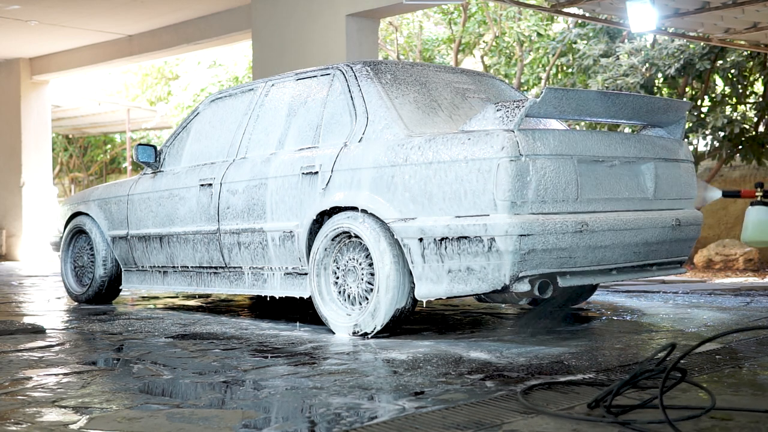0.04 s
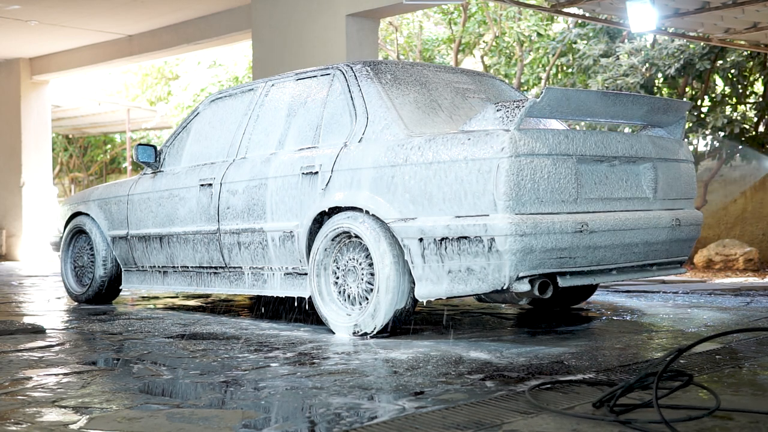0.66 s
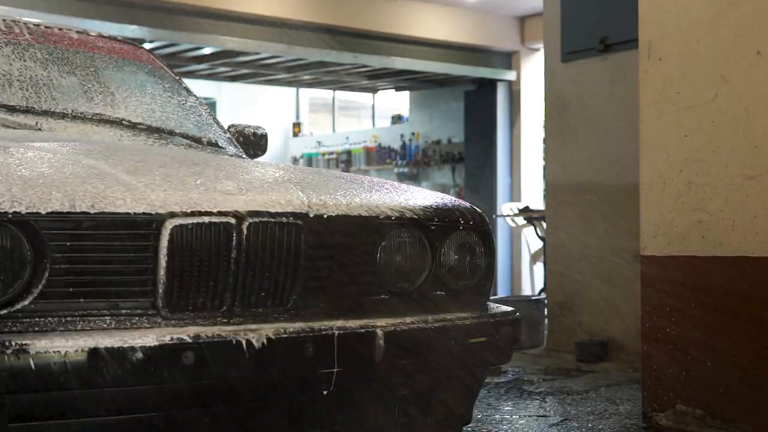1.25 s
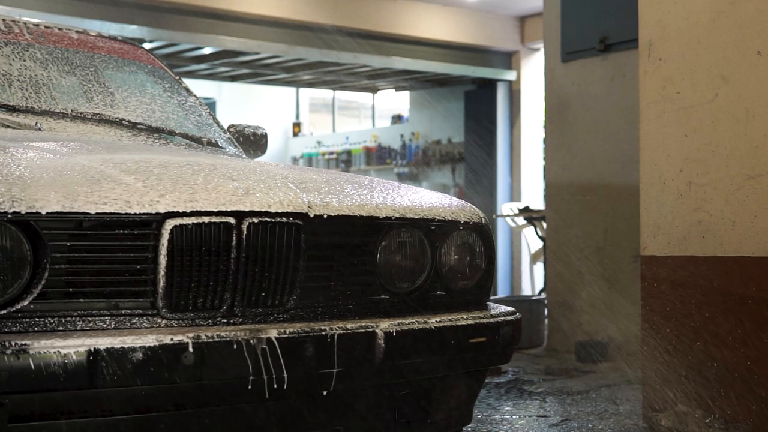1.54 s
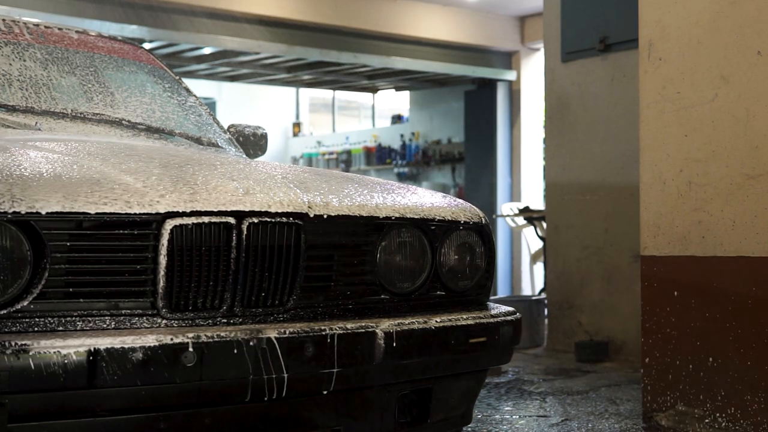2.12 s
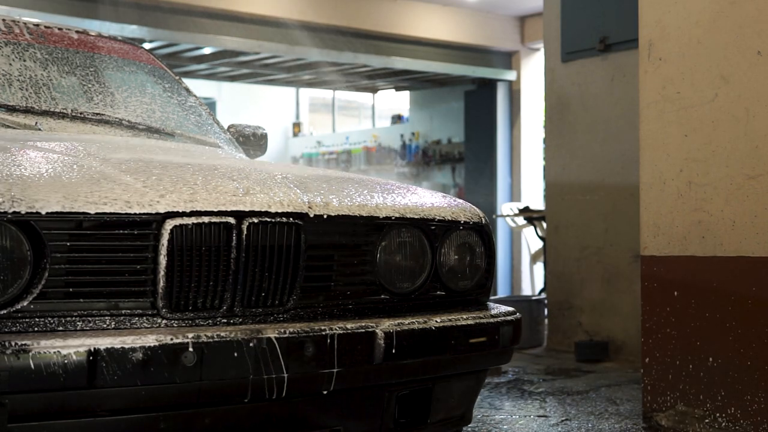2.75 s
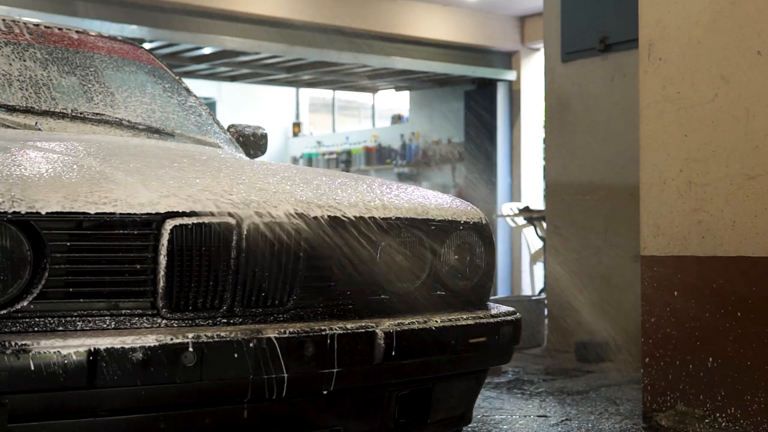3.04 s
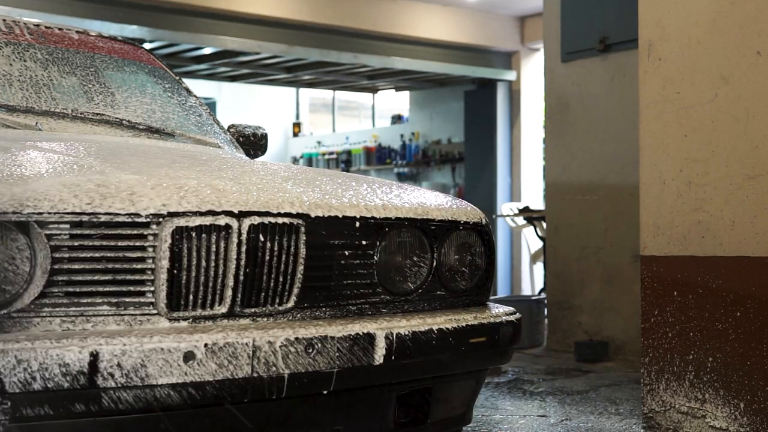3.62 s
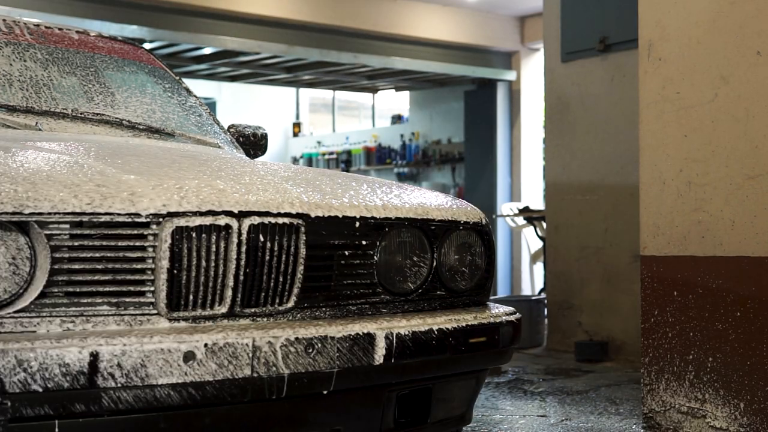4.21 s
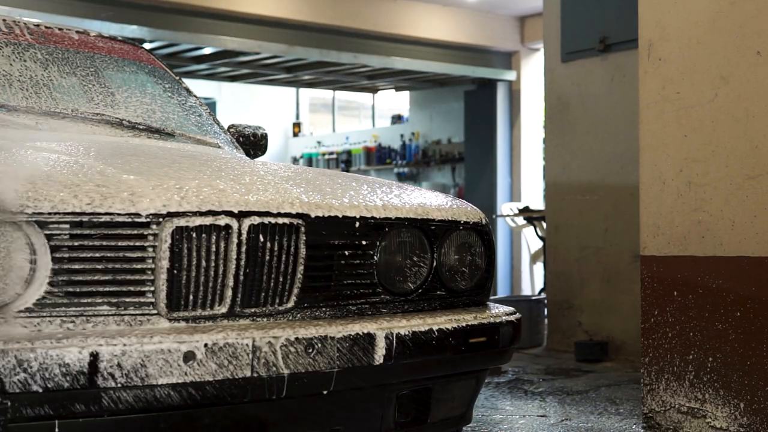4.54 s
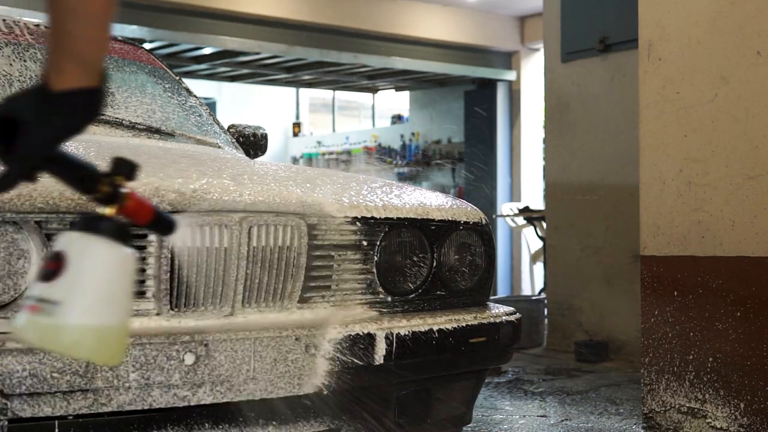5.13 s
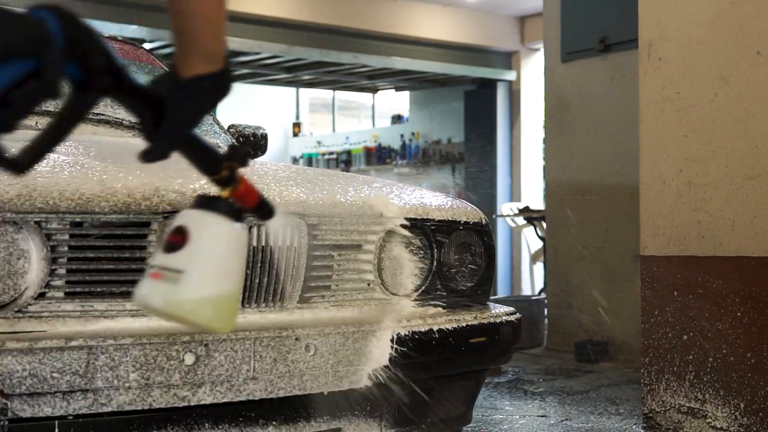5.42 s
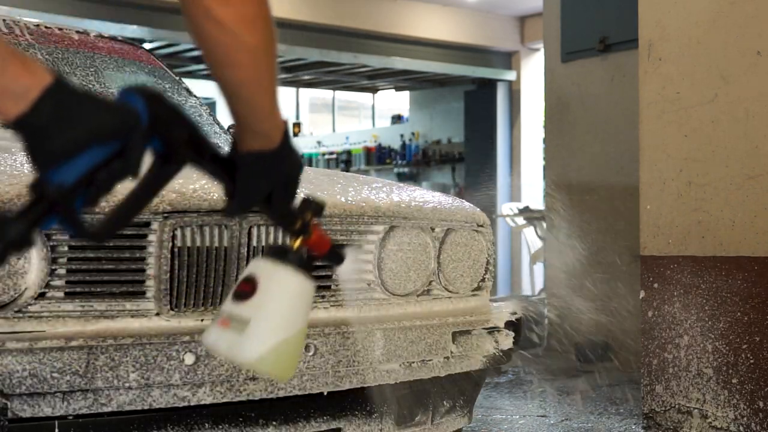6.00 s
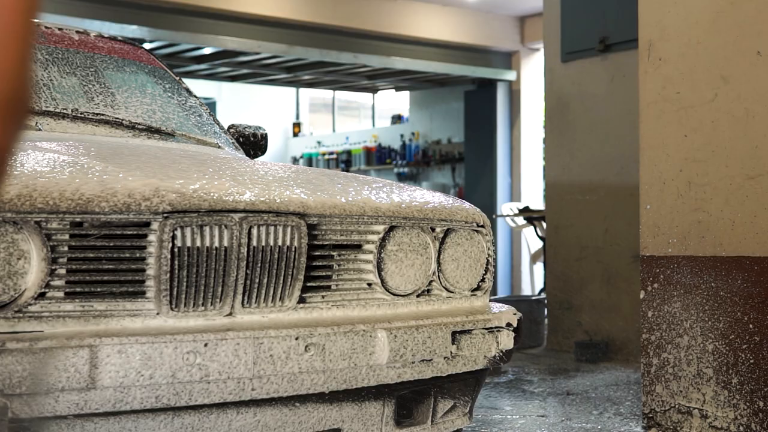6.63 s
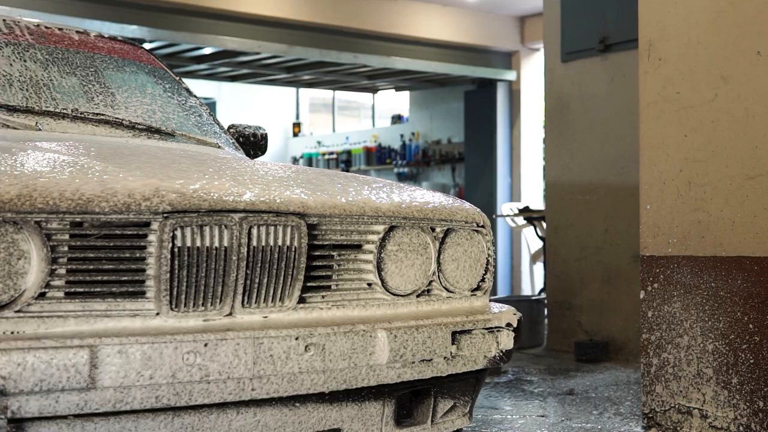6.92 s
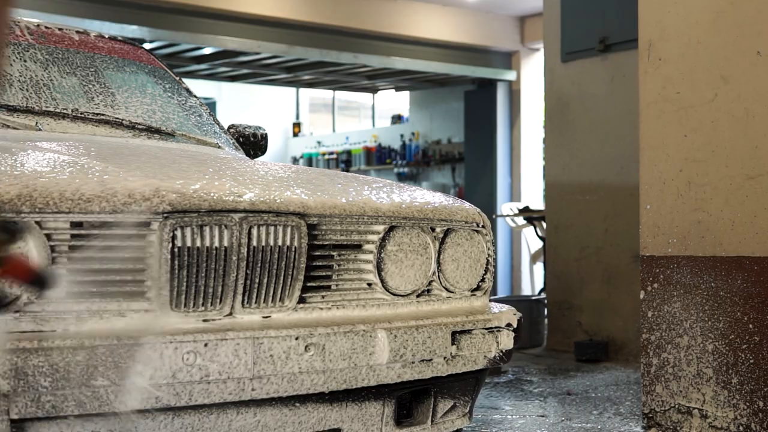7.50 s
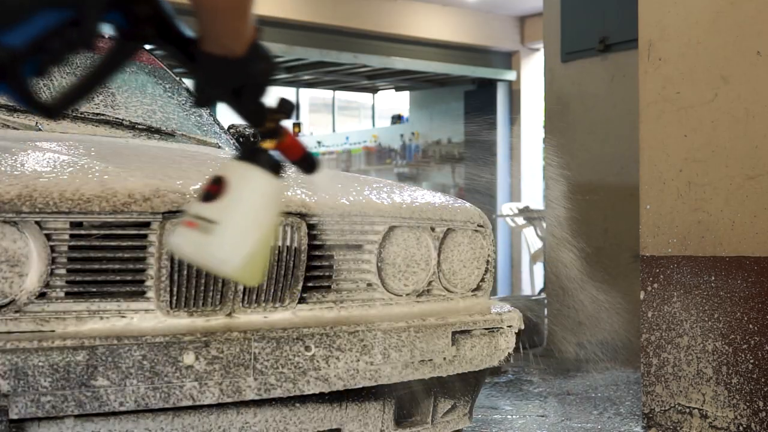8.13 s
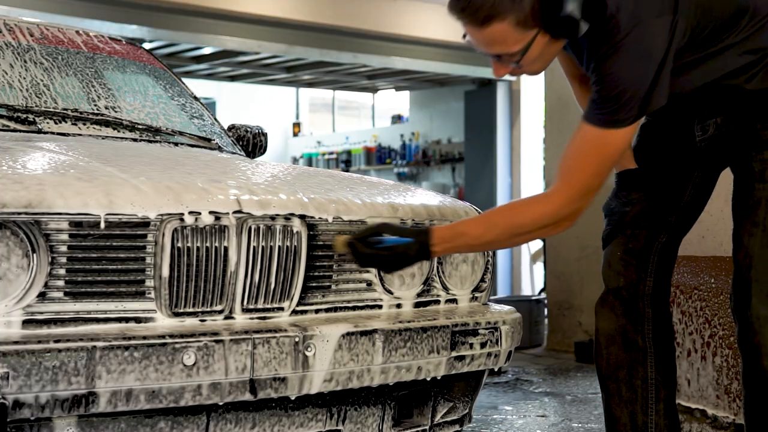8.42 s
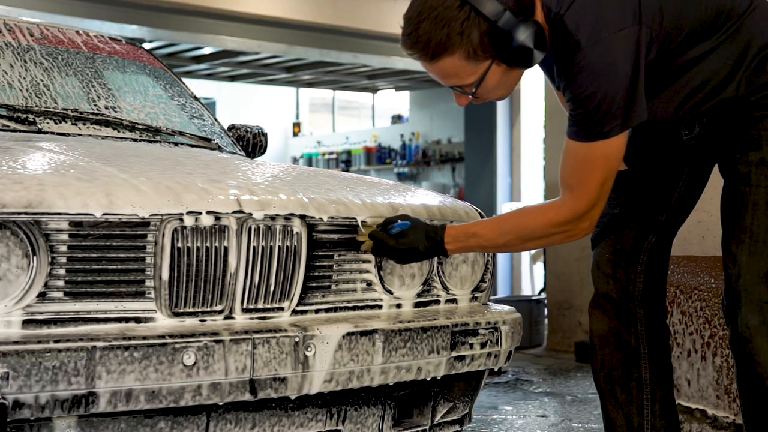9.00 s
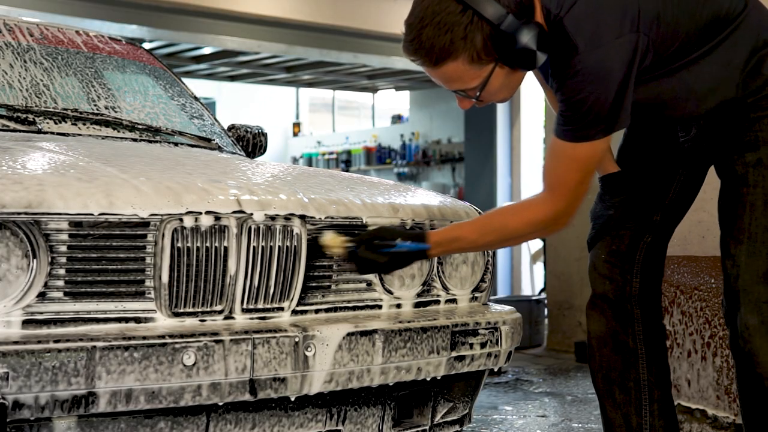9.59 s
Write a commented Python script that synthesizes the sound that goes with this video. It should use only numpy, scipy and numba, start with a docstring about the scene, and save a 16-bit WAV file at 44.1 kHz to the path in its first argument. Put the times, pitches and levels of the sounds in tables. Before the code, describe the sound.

A pressure washer hisses foam onto a car over a pump drone, then stops and a wet brush scrubs the grille.

```python
"""Foam wash in a concrete garage

A pressure washer soaps a car, first at the rear, near the droning pump, then at the front.
The turbulent jet hisses, the foam cannon's mixing chamber roars at its resonances, and droplets
patter on the bodywork. Then the spray stops and a soapy brush scrubs the grille over a low motor
hum. Something hollow bumps twice, faintly during the spraying and louder near the end."""
import sys
import numpy as np
from scipy import signal
from scipy.fft import rfft, irfft
from scipy.io import wavfile
from scipy.ndimage import map_coordinates
from numba import njit

SR = 44100
rng = np.random.default_rng(int(sys.argv[2]) if len(sys.argv) > 2 else 0)


def put_to_file(sound):
    """Save the sound as 16-bit audio at rate SR, in the file named by the first command-line argument."""
    columns = np.atleast_2d(sound).T  # one column per channel
    safe = np.clip(columns, -1, 1)
    whole_steps = np.round(safe * 32767)
    wavfile.write(sys.argv[1], SR, whole_steps.astype(np.int16))


N = 429975
T = np.arange(N) / SR
FREQS = np.fft.rfftfreq(N, 1 / SR)
FRONT_S, SCRUB_S = 0.901, 8.240  # the spray moves to the front; the scrubbing begins
SHAFT_HZ, PISTONS = 45.46, 3
TOP_HZ = 15750


# Hiss of the jet, louder as the nozzle turns toward the listener: time_s, level_db
NOZZLE_HISS = [(0.05, -38.0), (1.31, -37), (1.55, -36), (2.27, -37), (2.39, -37.5), (2.75, -35.5),
               (3.53, -39.5), (3.77, -37.5), (3.83, -40.4), (3.95, -39), (4.55, -38.7), (5.57, -36),
               (6.83, -38.5), (6.95, -40.5), (7.73, -37.1), (8.19, -39)]

def spray(turns, aim_db):
    """Common modulation: jet, splash and cannon share one sputtering flow that the pistons ripple."""
    # as the lance swings off the car, the sound widens and moves to the left
    facing_db = swing(NOZZLE_HISS)
    spread_db = at_car(-0.3, -0.55) - 0.4 * aim_db - 0.65 * facing_db
    pan_db = at_car(-0.96, 0.55) - 0.21 * aim_db - 0.27 * facing_db
    hiss = jet(curve(NOZZLE_HISS), aim_db, spread_db)
    wash = splash(aim_db, spread_db) + cannon(aim_db, spread_db)
    wash = reflections(wash, echo_db=-16.5, sway_ms=0.1)
    sputter_db = 0.45 * walk(18) + 0.44 * walk(300)
    ripple_db = 0.11 * np.sin(2 * np.pi * PISTONS * turns)
    return (hiss + wash) * undb(sputter_db + ripple_db + np.array([pan_db, -pan_db]) / 2)


# Strength of the wash at the front, dipping where a sweep runs off the car: time_s, level_db
LANCE_SWEEPS = [(0.96, -42.5), (1.38, -40), (2.46, -37.5), (2.52, -38.5), (2.76, -39), (2.88, -39.7),
                (3.42, -38.5), (3.6, -39), (3.66, -37.5), (3.84, -42.5), (4.08, -37), (4.32, -39),
                (4.56, -44.5), (4.74, -40.5), (6.24, -36), (6.3, -38.5), (6.54, -39), (6.9, -45),
                (7.08, -39.5), (7.38, -43.5), (7.98, -37), (8.19, -38)]

def lance_aim():
    """Incidence: the more squarely the jet strikes, the louder the wash (dB about its mean)."""
    return swing(LANCE_SWEEPS) * after(FRONT_S)


# Spectrum of the jet's hiss: frequency_hz, density_db
JET_SPECTRUM = [(2000, -28.5), (5000, -14.5), (7200, -10), (9500, -4), (11500, -2), (13000, -0.5),
                (15500, -3.5)]

def jet(nozzle_db, aim_db, spread_db):
    """Turbulence in a fast jet radiates broadband noise, strongest in the high treble."""
    hiss = tint(droplets(scatter_db=1, spread_db=spread_db), JET_SPECTRUM)
    level_db = nozzle_db - 0.07 + 0.38 * walk(25) + 0.071 * aim_db
    return unit(hiss, band_hz=(9000, 15000)) * undb(level_db)


# Resonances of the mixing chamber: pitch_ratio, width_hz, relative_db
CHAMBER_MODES = [(0.466, 630, -7), (.915, 666, -1), (1.0, 550, -0.5), (1.096, 610, -1)]

def cannon(aim_db, spread_db):
    """Cavity resonance: churning air and soap excite the chamber, and slugs of foam detune it."""
    roar_hz = at_car(4140, 3955) * np.exp(0.019 * walk(7.4))
    roar = 0
    for ratio, width_hz, db in CHAMBER_MODES:
        churn = droplets(scatter_db=2, spread_db=0.83 * spread_db)
        roar = roar + ring(churn, ratio * roar_hz, width_hz) * undb(db + 0.91 * walk(5))
    roar = unit(roar, band_hz=(3400, 4700)) * undb(0.3 * walk(45))
    roar *= driven(aim_db, rear_db=-39.5, front_db=-42.5, follow=1.12)
    return roar + whistle(aim_db) + surges()


def whistle(aim_db):
    """Narrowband resonance: the chamber's lowest mode filters noise almost to a tone."""
    pitch_hz = 1770 * np.exp(0.016 * walk(10))
    tone = ring(droplets(scatter_db=0.5), pitch_hz, width_hz=210)
    gain = driven(aim_db, rear_db=-54.5, front_db=-54.5, follow=0.47) * undb(2.7 * walk(7.3))
    return unit(tone, band_hz=(1700, 1900)) * gain


# Brief surges of one chamber resonance: middle_s, pitch_hz, level_db, length_s
CHAMBER_SURGES = [(.31, 4200, -39, 0.18), (1.38, 4390, -46, .2), (2.03, 4120, -43, .07),
                  (2.46, 4060, -43, .06), (2.79, 3860, -44, 0.083), (3.002, 3860, -41, .07),
                  (3.332, 4460, -40.5, 0.1), (3.46, 1790, -46.5, .16), (3.657, 3970, -45, .06),
                  (4.297, 1800, -48, .1), (5.196, 3830, -41, .05), (6.18, 3950, -50, .14),
                  (8.15, 1770, -46.5, .14)]

def surges():
    """Mode selection: now and then the chamber briefly locks onto one narrow resonance."""
    middles_s, pitches_hz, _, _ = np.transpose(CHAMBER_SURGES)
    nearest = np.abs(T - middles_s[:, None]).argmin(axis=0)
    envelope = sum(undb(db) * swell(s, length_s) for s, _, db, length_s in CHAMBER_SURGES)
    return unit(ring(droplets(scatter_db=1), pitches_hz[nearest], width_hz=180)) * envelope


# Spectrum of droplets striking the car: frequency_hz, density_db
SPLASH_SPECTRUM = [(300, -32), (750, -10.5), (1050, -8.5), (1500, -2.5), (2600, 2.5), (5000, 1), (7500, -4),
                   (15000, -11)]

def splash(aim_db, spread_db):
    """Impact noise: countless droplet strikes merge into a continuous patter."""
    patter = tint(droplets(scatter_db=3, spread_db=0.86 * spread_db), SPLASH_SPECTRUM)
    gain = driven(aim_db, rear_db=-46.5, front_db=-49.5, follow=1.12)
    return unit(patter, band_hz=(2200, 3100)) * gain


# Spectrum of water drumming on sheet metal: frequency_hz, density_db
PANEL_SPECTRUM = [(40, -34), (90, -32), (180, -8), (300, -3), (500, 3), (750, -0.5), (1100, -2), (2000, -2),
                  (6000, -55)]

def panels(aim_db):
    """Forced vibration: body panels driven by the water radiate in the midrange."""
    drumming = tint(droplets(scatter_db=2.5), PANEL_SPECTRUM)
    gain = driven(aim_db, rear_db=-56, front_db=-62.5, follow=1.04) * undb(0.8 * walk(10))
    return unit(drumming, band_hz=(610, 1100)) * gain


# Spectrum of the bonnet's hollow boom: frequency_hz, density_db
BONNET_SPECTRUM = [(40, -18), (90, -2), (140, -2), (220, -3), (400, 0), (1000, -40)]
# Swells where the jet lingers on the bonnet: middle_s, length_s, level_db
BONNET_SWELLS = [(1.85, .2, -67), (2.74, .36, -69), (4.18, .36, -77)]

def bonnet(aim_db, start_s=1.6):
    """Plate vibration: the broad sheet of the bonnet booms faintly under the jet."""
    steady = undb(-72.5 + 0.8 * aim_db + 1.5 * walk(4))
    swells = sum(undb(db) * swell(s, length_s) for s, length_s, db in BONNET_SWELLS)
    boom = unit(tint(droplets(scatter_db=1.5), BONNET_SPECTRUM))
    return boom * np.hypot(steady, swells) * after(start_s)


# Pump tones at the rear of the car: shaft_harmonic, relative_db
REAR_HARMONICS = [(2, -70.5), (3, -69), (4, -68), (5, -60), (6, -53), (7, -62), (8, -54.5), (9, -43),
                  (10, -49), (11, -55), (12, -52.5), (13, -58), (14, -73), (15, -54.5), (16, -69),
                  (17, -59.5), (19, -58.5), (20, -69), (21, -73), (22, -69), (24, -60), (25, -66),
                  (26, -63.2), (27, -71.5), (28, -71), (30, -64), (31, -57), (32, -62), (33, -72),
                  (34, -57.5), (36, -65), (39, -71), (40, -62), (43, -54)]
# Pump tones at the front of the car: shaft_harmonic, initial_relative_db, drift_db_per_s
FRONT_HARMONICS = [(3, -78, 0.5), (5, -73.5, 0), (6, -64, 0.54), (7, -76, 0), (8, -66.5, -.5),
                   (9, -63.5, -1.9), (10, -64, -0.6), (11, -65, 0), (12, -60, -0.83), (13, -71.5, 0.5),
                   (15, -69, 0), (18, -71, 0), (23, -78, 0), (24, -82, 1)]
# Spectrum of the rattling valves: frequency_hz, density_db
VALVE_SPECTRUM = [(40, -24), (140, -26), (230, -0.5), (400, 2.5), (600, -5), (900, -3.5), (1500, -15),
                  (2200, -7), (4500, -16), (9000, -24)]

def pump(turns, aim_db):
    """Periodic forcing: a drone and a valve rattle once a turn; only soft tones reach the front."""
    impacts = droplets(scatter_db=4.5) * undb(2.6 * np.cos(2 * np.pi * turns))
    rattle = undb(-49.5) * unit(tint(impacts, VALVE_SPECTRUM))
    near = undb(-2) * pump_tones(turns, REAR_HARMONICS, waver_db=0.8) + rattle
    drifting = [(order, db + drift * (T - FRONT_S)) for order, db, drift in FRONT_HARMONICS]
    far = undb(-0.97 + 0.98 * aim_db) * pump_tones(turns, drifting, waver_db=1.8)
    return at_car(near, far)


def pump_tones(turns, harmonics, waver_db):
    """Harmonic series of the shaft; shifting reflections make each tone waver in level and phase."""
    tones = 0
    for order, db in harmonics:
        phase = 2 * np.pi * (order * turns + rng.random()) + 0.11 * walk(3.7)
        tones = tones + np.sqrt(2) * undb(db + waver_db * walk(2.9)) * np.sin(phase)
    return tones


# Spectrum of bristles flicking over the slats: frequency_hz, density_db
BRISTLE_SPECTRUM = [(700, -19), (1600, -10), (3500, 0.5), (5800, -3), (8500, 0.5), (12000, 1),
                    (15500, -1.5)]
# Spectrum of wet rubbing: frequency_hz, density_db
RUB_SPECTRUM = [(400, -14), (900, -10), (1500, 3), (3500, -1), (6000, -7), (15000, -17)]

def brush():
    """Friction noise: bristles flick over the soapy slats, above a wet rub that lasts longer."""
    flicks = unit(tint(droplets(scatter_db=3.5, spread_db=-4), BRISTLE_SPECTRUM))
    flicks *= strokes(stretch=1, steepness=4.4) * undb(0.74 * walk(70))
    rub = unit(tint(droplets(scatter_db=4.5), RUB_SPECTRUM))
    rub *= strokes(stretch=1.63, steepness=4) * undb(-9)
    return flicks + rub


# Brush strokes to and fro: middle_s, length_s, level_db
BRUSH_STROKES = [(8.325, 0.046, -61.5), (8.735, 0.1, -53.5), (8.882, 0.11, -57), (9.042, 0.094, -50),
                 (9.193, 0.1, -50.5), (9.374, 0.09, -48), (9.513, 0.13, -55), (9.692, 0.096, -49.5)]

def strokes(stretch, steepness):
    """Friction noise grows with sliding speed, so each stroke's envelope peaks at its middle."""
    return sum(undb(db) / (1 + np.abs((T - s) / (stretch * length_s / 2)) ** steepness)
               for s, length_s, db in BRUSH_STROKES)


# Wet slap of the brush: start_s, level_db, t60_s
BRUSH_SLAPS = [(8.422, -29, 0.3)]
# Spectrum of squeezed foam: frequency_hz, density_db
FOAM_SPECTRUM = [(120, -7), (250, 2), (600, 2), (1300, -4), (2200, -7), (5000, -11.5), (9000, -15),
                 (15000, -23)]

def slap():
    """Cushioned impact: the brush squeezes out foam in a soft-edged burst of noise."""
    envelope = sum(undb(db) * decay(s, rise_s=0.067, t60_s=t60_s) for s, db, t60_s in BRUSH_SLAPS)
    return unit(tint(droplets(scatter_db=4.5), FOAM_SPECTRUM)) * envelope


# Hollow bumps in the garage: start_s, level_db, cutoff_hz
BLOWS = [(1.772, -48, 220), (9.591, -33.5, 1500)]
# Modes of the bumped object: pitch_hz, relative_db, t60_s
HOLLOW_MODES = [(140, -20, .3), (228, -8, 0.54), (273, -2, 0.18), (318, -1.5, 0.18), (385, -19, 0.18),
                (428, -10, 0.27), (540, -6, 0.2), (690, -9, 0.19), (793, 0, 0.12), (1023, -2, 0.092),
                (1230, -18, .12)]
# Spectrum of a bump's dull clatter: frequency_hz, density_db
CLATTER_SPECTRUM = [(100, -22), (250, 2.5), (560, -1.5), (1000, -12), (1500, -17), (6000, -22)]

def bumps(rise_s=0.0028):
    """Damped free vibration: soft blows excite low modes and a clatter, carried on by the walls."""
    thuds = 0
    for start_s, db, cutoff_hz in BLOWS:
        modes = 0
        for hz, mode_db, t60_s in HOLLOW_MODES:
            phase = 2 * np.pi * (hz * T + rng.random())
            modes = modes + undb(mode_db) * decay(start_s, rise_s, t60_s) * np.sin(phase)
        clatter = unit(tint(rng.standard_normal(N), CLATTER_SPECTRUM))
        clatter *= decay(start_s, rise_s, t60_s=0.33)
        blow = undb(db) * (1.84 * modes / np.abs(modes).max() + 1.1 * clatter)
        thuds = thuds + irfft(rfft(blow) / (1 + 1j * FREQS / cutoff_hz), N)  # one-pole low-pass
    return garage_echo(thuds, t60_s=0.54, wet_db=-3.5)


# Course of the motor hum during the scrubbing: time_s, relative_db
HUM_LEVELS = [(8.28, -47.5), (8.844, -51), (8.88, -65), (9.04, -45), (9.368, -50.5), (9.508, -45),
              (9.75, -49)]

def motor_hum(aim_db, pitch_hz=54.8):
    """Amplitude modulation: a low motor tone swells with the wash and is loudest during scrubbing."""
    spraying = driven(aim_db, rear_db=-68, front_db=-71, follow=1.2)
    scrubbing = undb(curve(HUM_LEVELS) - 1.2)
    gain = (spraying + (scrubbing - spraying) * after(SCRUB_S)) * undb(1.2 * walk(5))
    return np.sqrt(2) * gain * np.sin(2 * np.pi * pitch_hz * T + 0.06 * walk(3))


def reflections(x, echo_db, sway_ms, count=9):
    """Comb filtering: echoes off floor, car and pillars interfere as their paths shift with the lance."""
    total = x
    for delay_ms in np.geomspace(3, 24, count) * rng.uniform(0.85, 1.15, count):
        emitted_s = T - (delay_ms + sway_ms * walk(1.5)) / 1000
        echo = np.array([map_coordinates(channel, [emitted_s * SR], order=3) for channel in x])
        total = total + undb(echo_db) * echo
    return total / np.sqrt(1 + count * undb(echo_db) ** 2)


def garage_echo(x, t60_s, wet_db):
    """Reverberation: the concrete walls add a diffuse, decaying tail to the direct sound."""
    tail = (droplets(scatter_db=0) * decay(0, rise_s=0.006, t60_s=t60_s))[:, :SR]
    tail /= np.sqrt(np.sum(tail ** 2) / 2)
    return x + undb(wet_db) * signal.fftconvolve(x[None], tail, axes=1)[:, :N]


# Spectrum of the garage's background: frequency_hz, density_db
AIR_SPECTRUM = [(25, -6), (45, -6), (72, 4), (120, -4.5), (210, -3.5), (400, -9), (620, -11.5), (880, -6),
                (1300, -15), (2400, -23), (4400, -26.5), (6000, -34), (15000, -40)]

def garage_air():
    """Ambient noise: the dull rumble and rush of the open garage."""
    return unit(tint(droplets(scatter_db=2), AIR_SPECTRUM)) * undb(-48.5 + 0.25 * walk(6.3))


# Stereo width in the garage: frequency_hz, side_minus_mid_db
STEREO_WIDTH = [(60, -37), (200, -25), (380, -9.5), (700, -8), (1300, -7), (2400, -4.5), (4400, -0.5),
                (8000, 0), (15000, 2)]

def droplets(scatter_db, spread_db=0):
    """Interaural coherence: dense impacts of scattered size, lows alike in both ears, highs diffuse."""
    mid, side = rng.standard_normal((2, N)) * undb(scatter_db * rng.standard_normal(N))
    side = tint(side, STEREO_WIDTH) * undb(spread_db)
    return np.array([mid + side, mid - side])


def ring(x, hz, width_hz):
    """Cascaded resonance: two passes per channel steepen the skirts of a moving band."""
    width_hz = float(width_hz)
    return np.array([resonate(resonate(channel, hz, width_hz), hz, width_hz) for channel in x])


@njit
def resonate(x, hz, width_hz):
    """Second-order resonance: a state-variable band-pass with a moving centre."""
    y, band_state, low_state = np.empty(len(x)), 0., 0.
    for i in range(len(x)):
        step, damping = np.tan(np.pi * hz[i] / SR), width_hz / hz[i]
        band = (band_state + step * (x[i] - low_state)) / (1 + step * (step + damping))
        band_state = 2 * band - band_state
        low_state += 2 * step * band
        y[i] = damping * band
    return y


def undb(db):
    """Amplitude ratio of a level in decibels."""
    return 10 ** (np.asarray(db) / 20)


def curve(table):
    """Linear interpolation of (time_s, level_db) rows."""
    return np.interp(T, *np.transpose(table))


def swing(table):
    """Deviation in dB of a level curve from its mean while spraying."""
    db = curve(table)
    return db - db[T < SCRUB_S].mean()


def tint(x, spectrum):
    """Spectral shaping by (frequency_hz, gain_db) points on a logarithmic frequency axis."""
    hz, db = np.transpose(spectrum)
    gain = undb(np.interp(np.log(FREQS + 1), np.log(hz), db))
    return irfft(rfft(x) * gain, N)


def unit(x, band_hz=(20, TOP_HZ)):
    """Normalisation: the centre image gets rms 1 within a band."""
    in_band = (FREQS > band_hz[0]) & (FREQS < band_hz[1])
    bins = rfft(np.atleast_2d(x).mean(0))[in_band]
    return x * N / np.sqrt(2 * np.sum(np.abs(bins) ** 2))


def walk(rate_hz):
    """Low-passed noise: a smooth wander with standard deviation 1."""
    wander = irfft(rfft(rng.standard_normal(N)) / (1 + (FREQS / rate_hz) ** 4), N)
    return wander / wander.std()


def after(time_s):
    """Linear ramp from 0 to 1 over 4 ms."""
    return np.clip((T - time_s) / 0.004 + 0.5, 0, 1)


def decay(start_s, rise_s, t60_s):
    """Exponential rise and decay."""
    age_s = np.maximum(T - start_s, 0)
    return (1 - np.exp(-age_s / rise_s)) * np.exp(-np.log(1000) * age_s / t60_s)


def swell(middle_s, length_s):
    """Gaussian envelope."""
    return np.exp(-((T - middle_s) / (length_s / 2)) ** 2)


def at_car(rear, front):
    """Crossfade from a value at the rear of the car to one at the front."""
    return rear + (front - rear) * after(FRONT_S)


def driven(aim_db, rear_db, front_db, follow):
    """Power law: a gain that rises by `follow` dB for each dB of aim."""
    return undb(at_car(rear_db, front_db) + follow * aim_db)


def scene():
    """Superposition: spraying gives way to scrubbing, with the bumps and the hum added across both."""
    turns = np.cumsum(SHAFT_HZ * (1 + 0.00066 * walk(1.7))) / SR
    aim_db = lance_aim()
    washer = spray(turns, aim_db) + panels(aim_db) + bonnet(aim_db) + pump(turns, aim_db)
    scrubbing = brush() + slap() + garage_air()
    spray_off = after(SCRUB_S)
    return washer * (1 - spray_off) + scrubbing * spray_off + bumps() + motor_hum(aim_db)


def record(dry):
    """Band limiting: an elliptic low-pass cuts the top of the treble steeply."""
    return signal.sosfilt(signal.ellip(12, 0.1, 80, TOP_HZ, fs=SR, output="sos"), dry)


dry = scene()
out = record(dry)
put_to_file(out)
```